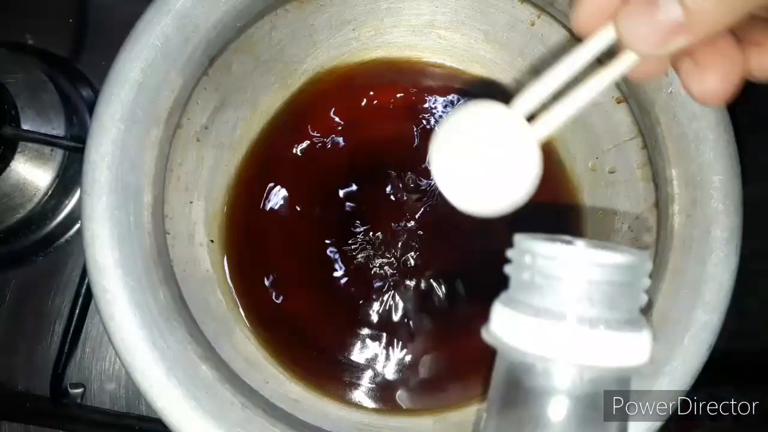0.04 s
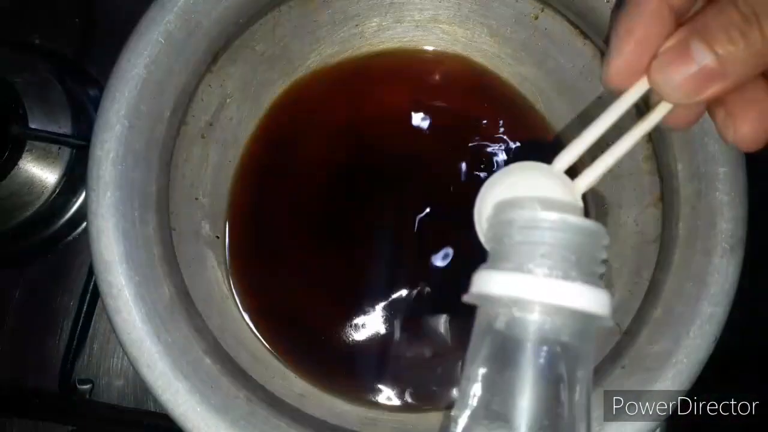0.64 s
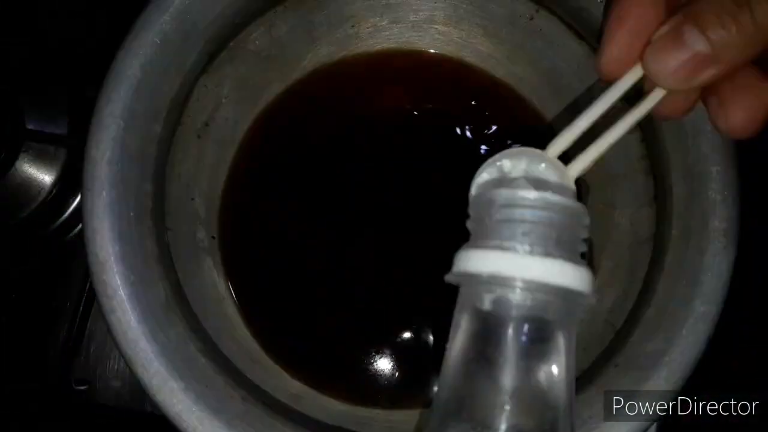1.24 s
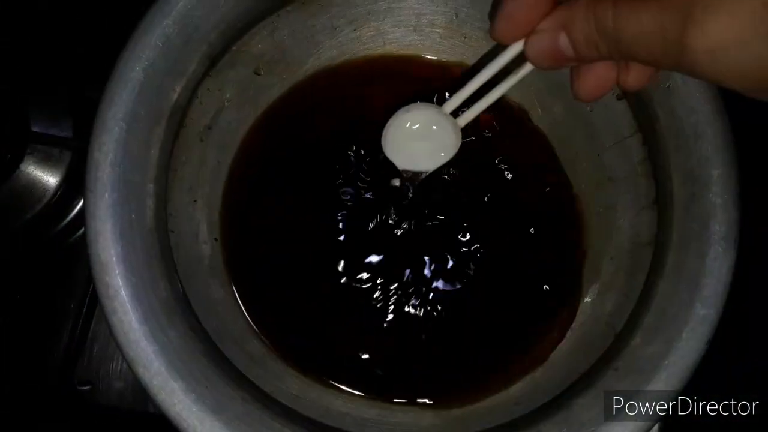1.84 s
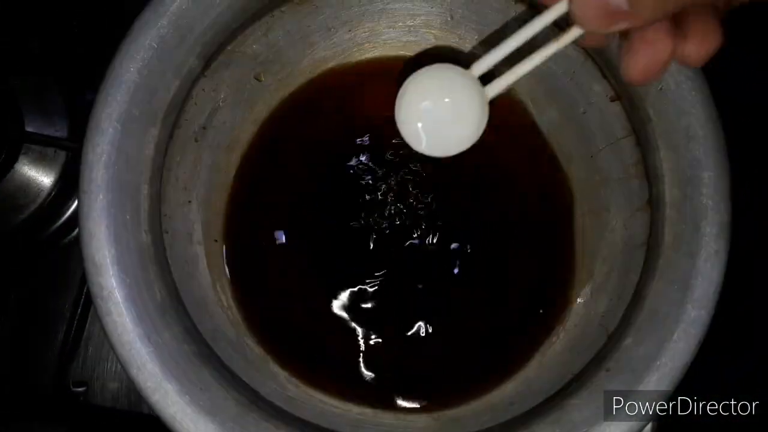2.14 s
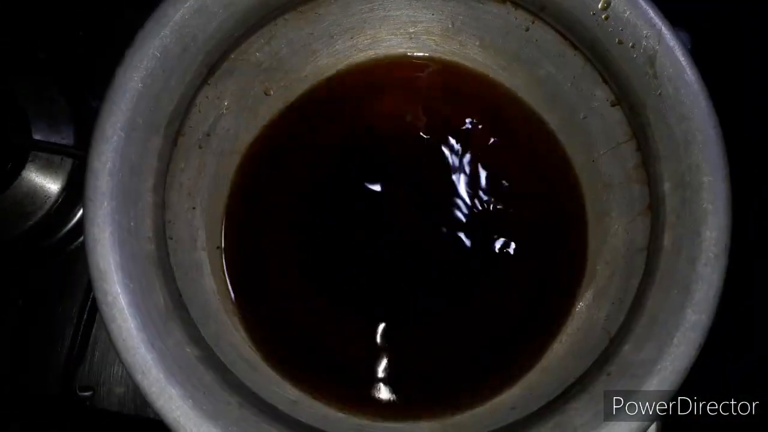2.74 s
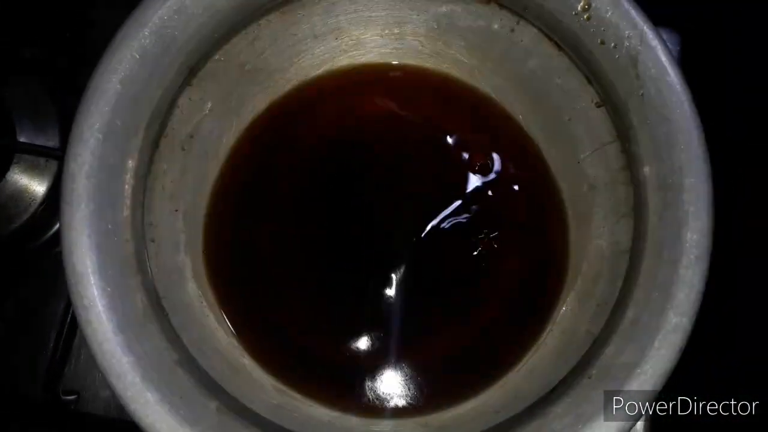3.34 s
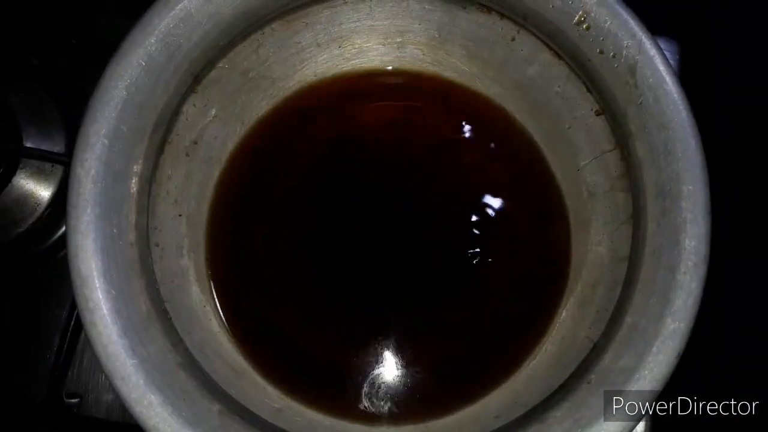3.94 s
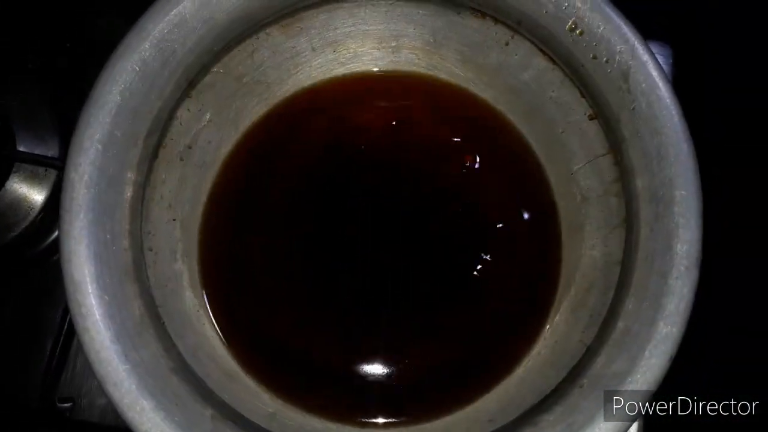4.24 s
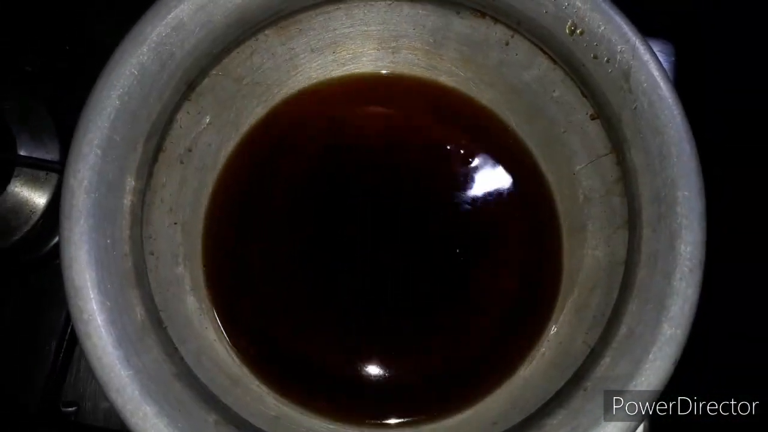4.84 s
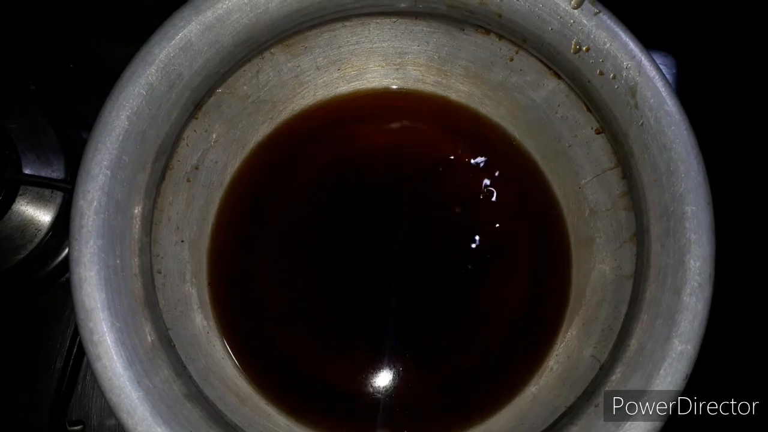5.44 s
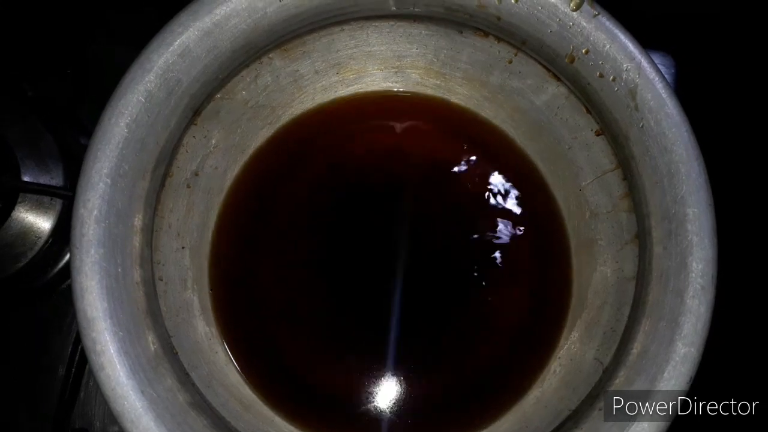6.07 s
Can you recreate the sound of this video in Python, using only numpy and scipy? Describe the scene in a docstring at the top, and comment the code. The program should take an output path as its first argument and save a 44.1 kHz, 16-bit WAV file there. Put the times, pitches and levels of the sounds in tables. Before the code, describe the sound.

In a kitchen, heard from just above a metal pot, sauce simmers with tiny pops over a quiet, steady gas hiss and a faint hum. Drops of liquid splash into the sauce close by, ringing briefly with high plinks, and a short fizz follows. Farther away, hard kitchen items are set down with a few light clacks. Near the end a cupboard door, also distant, bangs shut with a small after-bump.

```python
"""A gas burner hisses and softly roars under a metal pot, the microphone just above the simmering sauce.
Tiny bubbles burst on the surface, and a faint electric hum hangs in the kitchen.
At 1.6 s a spoonful of liquid goes in, close by: drops slap the sauce and trap small ringing bubbles.
From 2.9 s kitchenware clacks across the room; at 5.3 s, also farther off, something like a cupboard
door bangs shut and settles."""
import sys
import numpy as np
from scipy import signal
from scipy.fft import rfft, irfft
from scipy.io import wavfile

SR = 44100
rng = np.random.default_rng(int(sys.argv[2]) if len(sys.argv) > 2 else 0)


def inscribe(sig):
    """Save sig as 16-bit PCM at rate SR to the path in sys.argv[1].

    A 1-D sig is mono; a 2-D sig holds one channel per row.
    Samples are clipped to [-1, 1] before scaling.
    """
    pcm = np.round(np.clip(np.atleast_2d(sig).T, -1, 1) * 32767)
    wavfile.write(sys.argv[1], SR, pcm.astype(np.int16))


N = 273721
TIME = np.arange(N) / SR
EVENT_TIME = TIME[:SR]  # the one second in which a single sound rings out


def amp(db):
    """Decibels to gain."""
    return 10 ** (np.asarray(db) / 20)


def unit_rms(x):
    """Scales to rms 1."""
    return x / np.sqrt(np.mean(x ** 2) + 1e-20)


def curve_at(points, hz):
    """Reads a table on a log-frequency axis."""
    f, value = np.transpose(points)
    return np.interp(np.log(hz + 1), np.log(f + 1), value)


def add(mix, start_s, sound):
    """Mixes a sound in, in place."""
    part = mix[round(start_s * SR):][:len(sound)]
    part += sound[:len(part)]


def freqs(x):
    """Frequencies of the spectrum of x."""
    return np.fft.rfftfreq(len(x), 1 / SR)


def noise(colour, size=SR):
    """Noise of rms 1 with the given colour."""
    white = rng.standard_normal(size)
    return unit_rms(irfft(rfft(white) * amp(curve_at(colour, freqs(white))), size))


def ringing_noise(hz, half_width):
    """Noise of rms 1 in one resonance."""
    resonance = 1 / (1 + ((freqs(EVENT_TIME) - hz) / half_width) ** 2)
    return unit_rms(irfft(rfft(rng.standard_normal(SR)) * resonance, SR))


def drift(rate_hz):
    """Random wander of rms 1, mostly slower than rate_hz."""
    spectrum = rfft(rng.standard_normal(N))
    return unit_rms(irfft(spectrum / (1 + (freqs(TIME) / rate_hz) ** 4), N))


def fade(t60):
    """Falls by 60 dB in t60 seconds."""
    return np.exp(-np.log(1000) * EVENT_TIME / t60)


def mode(hz, t60, rise_s):
    """A sine that builds up and dies away."""
    return np.sin(2 * np.pi * hz * EVENT_TIME) * fade(t60) * (1 - np.exp(-EVENT_TIME / rise_s))


# colours of the flame and of the gas jets under the pot: f/Hz, level/dB
FLAME_ROAR = [(25, -47), (60, -11), (82, -12), (112, 0), (155, -7), (250, -2.5), (330, -5), (480, -11),
              (590, -8.5), (650, -3), (760, -6), (920, -12.5), (2100, -14.5), (3300, -34)]
GAS_HISS = [(2000, -9.5), (3150, -4.5), (3700, 4), (4400, 5), (6000, 4.5), (7000, 1.5), (7900, -1),
            (8500, 5.5), (9100, 0), (9700, -9), (12700, -13), (13600, -19), (15500, -29)]
# air resonances around the pot: f/Hz, width/Hz, boost/dB
POT_RESONANCES = [(1514, 130, 3.5), (2067, 53, 5.5), (2617, 66, 8), (3840, 60, 0), (4580, 180, 2),
                  (5170, 260, 2), (5960, 130, 3.5), (6740, 210, 3.5), (7520, 240, 5), (8420, 160, 0)]


def burner(roar_db=-53, hiss_db=-49, flutter_db=0.43, flicker_db=1.01, rise_db_per_s=0.23):
    """Close below the microphone the flame roars and gas hisses from the jets; the pot colours both."""
    roar = noise(FLAME_ROAR + [(8000, -55)], N) * amp(roar_db + flutter_db * drift(rate_hz=25))
    hiss = noise(GAS_HISS, N) * amp(hiss_db + flicker_db * drift(rate_hz=37))
    pot_db = sum(db / (1 + (2 * (freqs(TIME) - hz) / width) ** 2) for hz, width, db in POT_RESONANCES)
    swell_db = -3 + rise_db_per_s * TIME + 0.55 * drift(rate_hz=1.3)
    return irfft(rfft(roar + hiss) * amp(pot_db), N) * amp(swell_db)


# tones of the electric hum: f/Hz, level/dB
MOTOR_TONES = [(48.4, -74), (102, -69), (247.6, -64), (624.5, -72)]


def motor_hum(waver=0.00382, throb_db=1.5):
    """Somewhere in the kitchen a motor hums, each tone wavering in level and pitch."""
    out = np.zeros(N)
    for hz, db in MOTOR_TONES:
        peak = np.sqrt(2) * amp(db + throb_db * drift(rate_hz=4.7))
        pitch_hz = hz * (1 + waver * drift(rate_hz=3.77))
        out += peak * np.sin(2 * np.pi * np.cumsum(pitch_hz) / SR)
    return out


# colour of a splash at close range: f/Hz, level/dB
SPLASH_COLOUR = [(300, -50), (1200, -9), (2200, -10), (5000, 13), (9000, 6), (13000, 4), (16000, -10)]


def splash(t60):
    """A thin film of liquid tears: a short burst with no bass."""
    colour = unit_rms(amp(curve_at(SPLASH_COLOUR, freqs(EVENT_TIME))))
    burst = np.roll(rng.standard_normal(SR) * fade(t60), 10)
    return irfft(rfft(burst) * colour, SR)[:SR // 2]


def fizz(simmer_per_s=2, flurry_per_s=260, settle_s=0.11, tick_db=-52, spread_db=5):
    """Tiny bubbles burst just under the microphone, thickly at the start and again after the pour."""
    flurries = sum((TIME >= start_s) * np.exp(-abs(TIME - start_s) / settle_s) for start_s in (0, 2.05))
    bursts = rng.random(N) < (simmer_per_s + flurry_per_s * flurries) / SR
    sizes = amp(tick_db + spread_db * np.minimum(rng.exponential(1, N), 3))
    return signal.oaconvolve(bursts * sizes, splash(t60=0.0026))[:N]


def drop(hz, ring_cycles=66, glide=0.017, froth_db=-9, froth_width=0.097, spray_db=-18):
    """One drop splashes, sprays and rings a trapped bubble amid a froth of like-sized ones."""
    t60 = ring_cycles / hz  # small bubbles die sooner
    rising = hz * (1 + glide * np.minimum(EVENT_TIME / t60, 1))  # the bubble nears the surface
    froth = amp(froth_db) * ringing_noise(hz, froth_width * hz) * fade(t60)
    swell = 1 - np.exp(-EVENT_TIME * hz)  # about one cycle to get going
    sound = swell * (mode(rising, t60, rise_s=0.5 / hz) + froth)
    splash_db = -16 + 10.5 * np.log2(hz / 4000)  # the smaller the bubble, the more it is all tick
    add(sound, 0, amp(splash_db) * (splash(t60=0.013) + amp(spray_db) * splash(t60=0.11)))
    return sound


def droplets(start_s=1.63, length_s=0.65, per_s=38, db=-40.5, spread_db=4, low_hz=4270, high_hz=9900):
    """Faint droplets scattered almost evenly through the pour, as rows of t/s, level/dB, f/Hz."""
    draws = rng.random((round(per_s * length_s), 3))
    return [(start_s + length_s * when ** 0.93,
             db + spread_db * (2 * strength - 1),
             low_hz * (high_hz / low_hz) ** pitch) for when, strength, pitch in draws]


# the loudest drops and the bubbles they trap: t/s, level/dB, f/Hz
LOUD_DROPS = [(1.6249, -29, 4330), (1.6294, -18.5, 7600), (1.6553, -37, 11500), (1.6636, -20, 3960),
              (1.6650, -33, 3380), (1.6798, -30, 11000), (1.688, -29, 9450), (1.688, -39, 3040),
              (1.7060, -28.5, 6850), (1.7089, -29.5, 12200), (1.7845, -14, 5650), (1.7854, -34, 2117),
              (1.7865, -6, 3896), (1.9715, -32, 5050), (1.9728, -38.5, 741), (1.9767, -30, 7600),
              (1.988, -32.5, 4160), (1.9950, -31.5, 7600), (2.0838, -35, 6430), (2.1575, -41.5, 1780),
              (2.1683, -35.5, 11000)]


def spoonful(reverb_db=-12, echo_db=-20):
    """Drops fall into the sauce close to the microphone; the kitchen walls throw the sound back."""
    direct = np.zeros(N)
    for start_s, db, hz in LOUD_DROPS + droplets():
        add(direct, start_s, amp(db) * drop(hz))
    walls = kitchen_decay(noise([(500, 5), (2500, 6), (4500, -2), (7000, -23), (15000, -15)]))
    walls *= (1 - fade(t60=0.023)) * fade(t60=1.0)
    walls *= amp(reverb_db) / np.linalg.norm(walls)
    for delay_s in (0.0168, 0.0228):  # near surfaces above the stove, which soften the treble
        add(walls, delay_s, amp(echo_db) * signal.windows.hann(5) / 2)
    return direct + signal.oaconvolve(direct, walls)[:N]


# reverberation of the kitchen: f/Hz, t60/s
KITCHEN_T60 = [(60, 0.91), (200, 0.64), (500, 0.51), (1500, 0.53), (4500, 0.42), (8000, 0.27),
               (15000, 0.43)]


def kitchen_decay(x):
    """Each band dies away at the room's own speed."""
    hz, t, bands = signal.stft(x, SR, nperseg=512)
    decay = np.exp(-np.log(1000) * t / curve_at(KITCHEN_T60, hz)[:, None])
    return signal.istft(bands * decay, SR, nperseg=512)[1][:len(x)]


# pieces set down: t/s, level/dB, contact/s, lowest ring f/Hz, worktop thud f/Hz, relative thud level/dB
WARE_CLACKS = [(2.9414, -37.5, 0.0021, 2070, 297, -14), (3.0140, -39, 0.0036, 1960, 295, -13),
               (3.0214, -27.5, 0.001, 1927, 306, -19), (3.5450, -49.5, .023, 2200, 266.4, -1),
               (4.1280, -39, 0.0027, 2170, 323, -20), (4.2330, -40.5, .0034, 1770, 328, -14),
               (4.2390, -37, 0.0061, 2350, 329, -16), (4.4080, -42, 0.018, 2060, 327, -21)]
# rings of one piece: ratio to its lowest ring, level/dB, half-width/Hz
WARE_MODES = [(1, -10, 90), (1.19, -8.5, 70), (1.57, -14, 80), (2.13, -1.5, 120), (2.22, -1.5, 90)]
# colour of the scrape in a clack: f/Hz, level/dB
WARE_SCRAPE = [(100, -30), (300, -12), (700, -13.5), (1100, -8), (1500, -19), (2100, -6), (2900, -13),
               (3600, 5), (4400, 3.5), (5400, 5), (6600, -13.5), (9000, -14), (11000, -25), (16000, -40)]


def kitchenware(crack_t60=0.022, early_db=-2, early_t60=0.078, tail_db=-8, thud_t60=0.46):
    """Hard things set down across the room: a ringing crack, a thud, early echoes and the room's tail."""
    out = np.zeros(N)
    for start_s, db, contact_s, lowest_hz, thud_hz, thud_db in WARE_CLACKS:
        softness = np.log2(contact_s / 0.00089)  # a longer contact makes a weaker, duller crack
        crack_db, tilt_db_per_octave = 5 - 5 * softness, -3 * softness
        scrape_gain = amp(3.5 + 0.26 * (db + 28))  # hard blows scrape more, light ones mostly ring
        rings = [(lowest_hz * ratio, amp(ring_db + tilt_db_per_octave * np.log2(ratio)), width)
                 for ratio, ring_db, width in WARE_MODES]
        crack = sum(gain * mode(hz, crack_t60, rise_s=0.5 / hz) for hz, gain, _ in rings)
        crack += scrape_gain * noise(WARE_SCRAPE) * fade(crack_t60)
        # reflections smear the same pitches into bands of noise
        smear = scrape_gain * noise(WARE_SCRAPE)
        smear += sum(gain * ringing_noise(hz, width) for hz, gain, width in rings)
        echoes = amp(early_db) * smear * fade(early_t60) + amp(tail_db) * kitchen_decay(smear)
        clack = (amp(crack_db) * crack + echoes) * (1 - fade(contact_s))
        thud = amp(thud_db) * mode(thud_hz, thud_t60, rise_s=0.0031)
        add(out, start_s, amp(db) * (clack + thud))
    return out


# blows of the door on its frame: t/s, level/dB, build-up/s, centre of the force f/Hz, spread/octaves
DOOR_BLOWS = [(5.2858, -32, 0.0033, 450, 4), (5.2909, -23, 0.0084, 1000, 6.8),
              (5.3120, -23.5, 0.013, 550, 4.5), (5.5980, -38, 0.032, 400, 1.8),
              (5.643, -29.5, 0.013, 119, 0.23), (5.6500, -42.5, 0.014, 334, 1.4)]
# strong modes of the panel: f/Hz, level/dB, t60/s
DOOR_MODES = [(85.7, -9, 1.05), (117.3, 4, 0.2), (187.6, -15, 0.7), (234, -8.5, 0.51), (350.2, -5.5, 0.45),
              (396.5, -7.5, 0.28), (508, -13, 0.24), (575, -10.5, 0.32), (722, -23, 0.68), (789, -12, 0.47),
              (1170, -20, .45), (1384, -16, 0.39), (1527, -21, 0.5), (2054, -11, .35), (2318, -16, 0.36),
              (2461, -11.5, 0.25), (3410, -10.5, 0.29), (4370, -9, 0.33), (4940, -7.5, 0.22)]
# colour of its broad rattle: f/Hz, level/dB
DOOR_RATTLE = [(30, -36), (60, -11), (130, -7), (250, 3), (500, -3), (800, -3.5), (950, -9), (2200, -8),
               (4500, -4.5), (5600, -7), (6600, -13), (8800, -14), (10000, -22.5), (15500, -36)]


def cupboard_door(tail_db=-1, snap_db=-8, snap_t60=0.048, thicket_db=2, thicket_step_hz=22):
    """Away from the stove a panel hits its frame in quick blows, rings low and bumps as it settles."""
    out, hz_axis = np.zeros(N), freqs(EVENT_TIME)
    # above its few strong modes the panel has a thicket of weak ones, the same for every blow
    knots = np.arange(0, SR / 2, thicket_step_hz)
    heights = np.clip(rng.standard_normal(SR)[:len(knots)], -2, 2)
    thicket = np.interp(hz_axis, knots, heights)
    panel = amp(thicket_db * thicket * np.clip(hz_axis / 1000, 0, 1))
    for start_s, db, build_up_s, centre_hz, octaves in DOOR_BLOWS:
        force = lambda hz: 1 / (1 + (np.log2((hz + 1) / centre_hz) / octaves) ** 2)
        rattle = irfft(rfft(noise(DOOR_RATTLE)) * force(hz_axis) * panel, SR)
        snap = amp(snap_db) * rattle * fade(snap_t60)
        tail = amp(tail_db) * kitchen_decay(rattle)
        ring = sum(amp(mode_db) * force(hz) * mode(hz, t60, build_up_s) for hz, mode_db, t60 in DOOR_MODES)
        add(out, start_s, amp(db) * ((snap + tail) * (1 - fade(build_up_s)) + ring))
    return out


def scene():
    """The kitchen in mono, from just above the pot."""
    return (burner() + motor_hum() + fizz() + spoonful() + kitchenware() + cupboard_door())[None]


def record(dry, low_cut_hz=42, high_cut_hz=15800):
    """The small microphone drops the deepest bass; a steep low-pass takes off the highest treble."""
    low_cut = signal.butter(2, low_cut_hz, "highpass", fs=SR, output="sos")
    high_cut = signal.firwin(511, high_cut_hz, window=("kaiser", 9), fs=SR)
    return signal.oaconvolve(signal.sosfilt(low_cut, dry), high_cut[None], "same")


dry = scene()
out = record(dry)
inscribe(out)
```